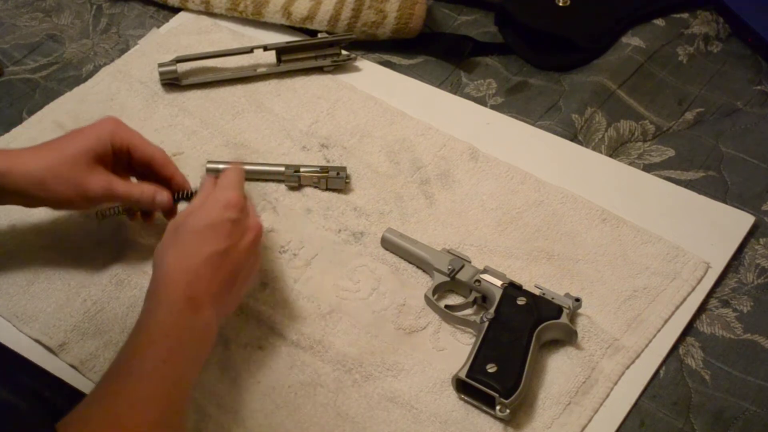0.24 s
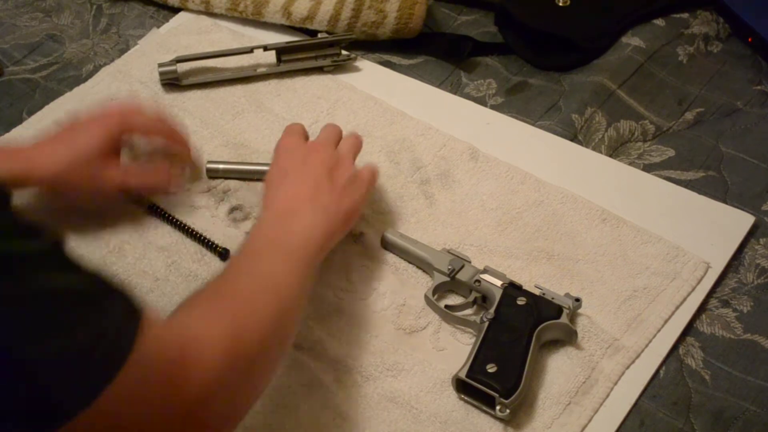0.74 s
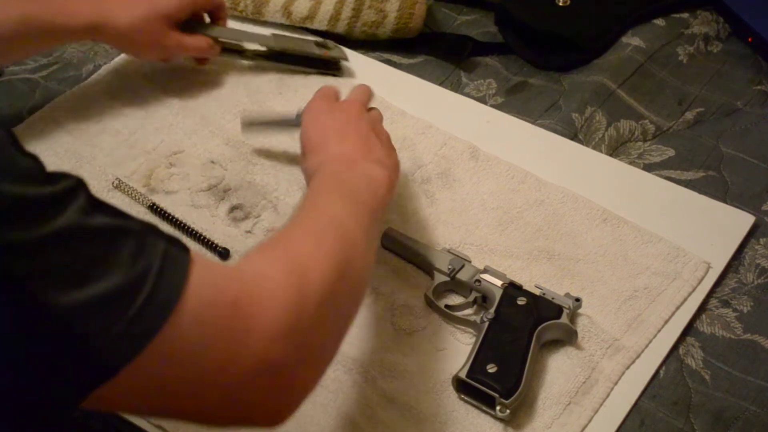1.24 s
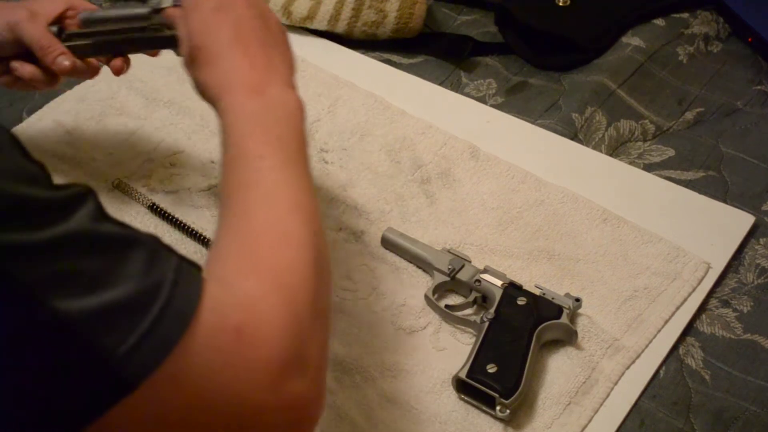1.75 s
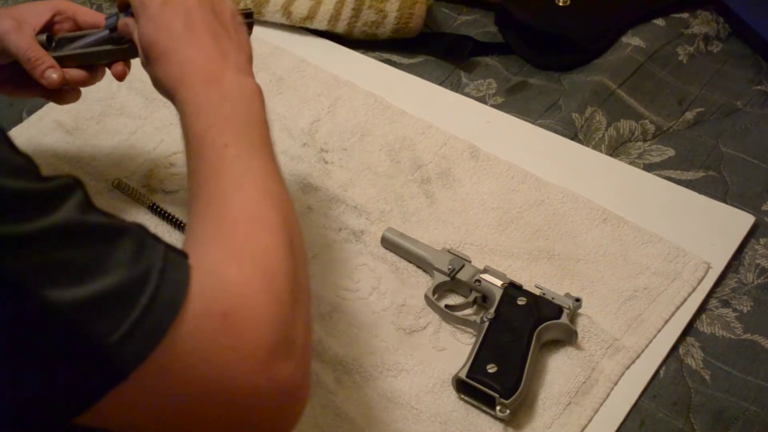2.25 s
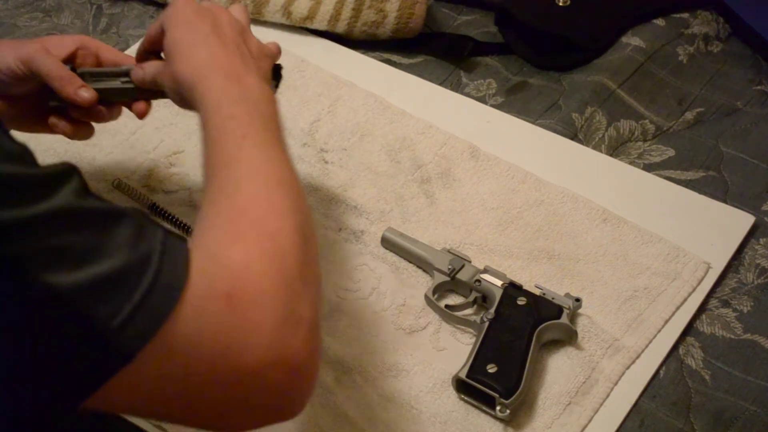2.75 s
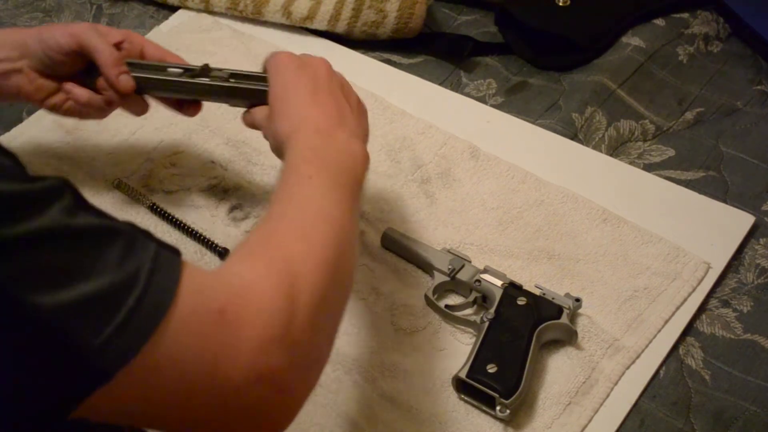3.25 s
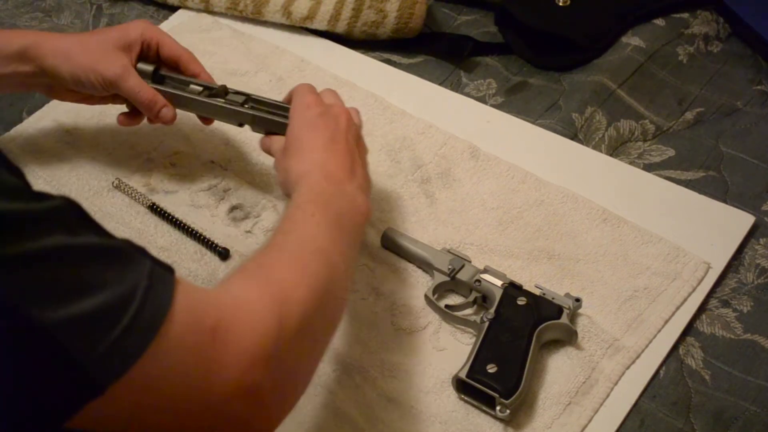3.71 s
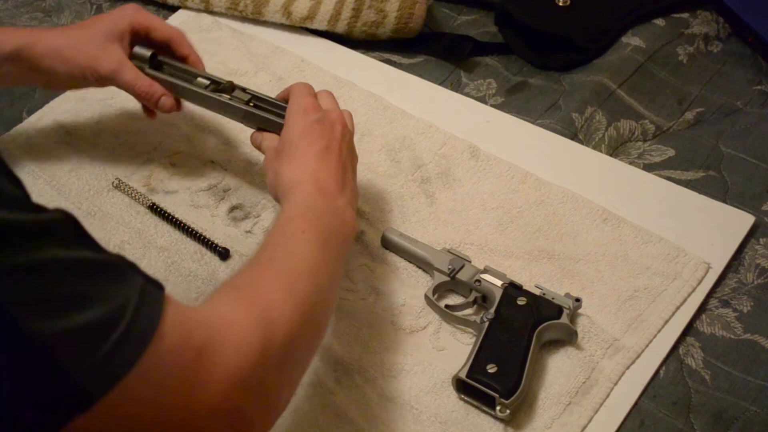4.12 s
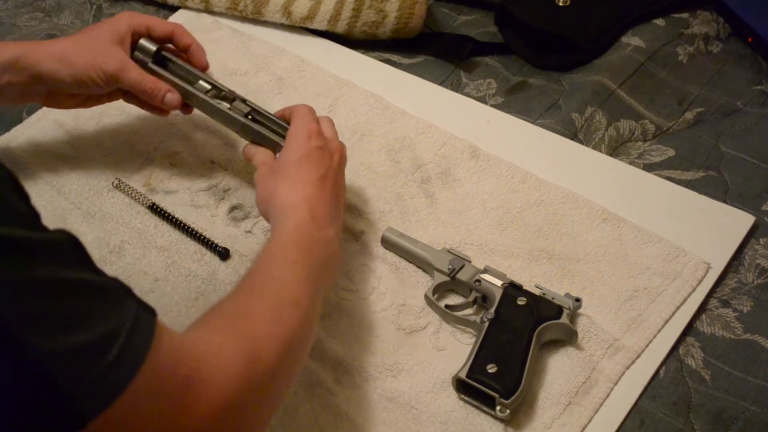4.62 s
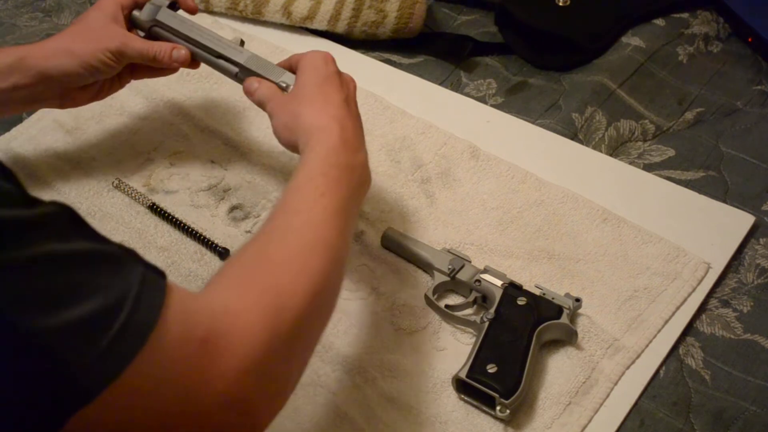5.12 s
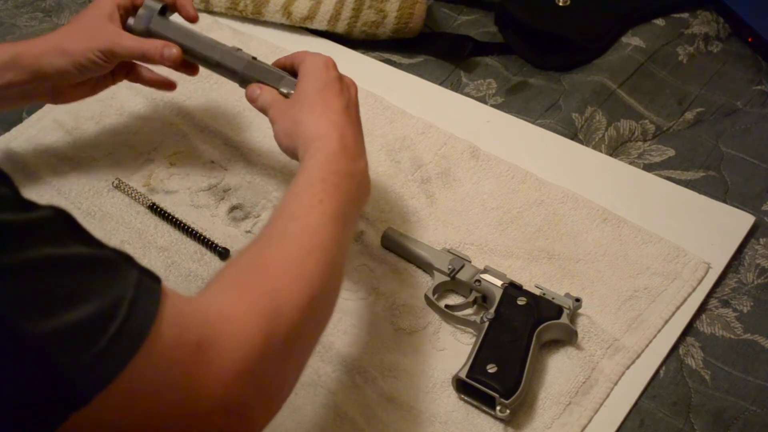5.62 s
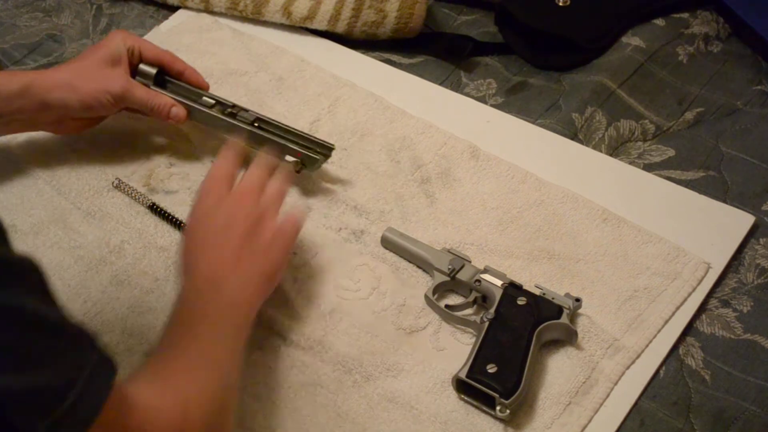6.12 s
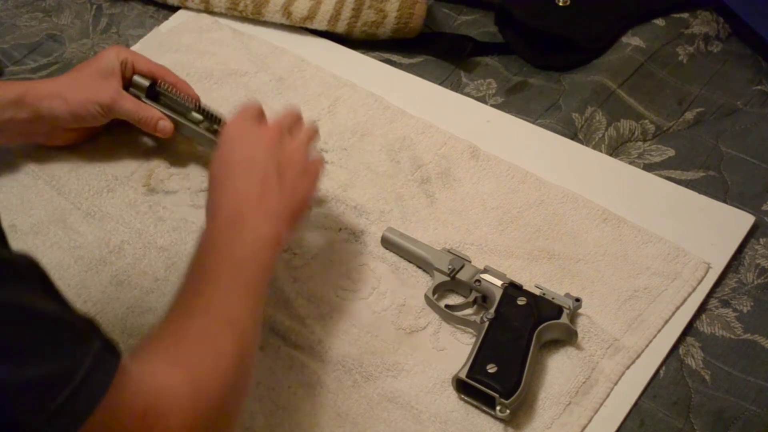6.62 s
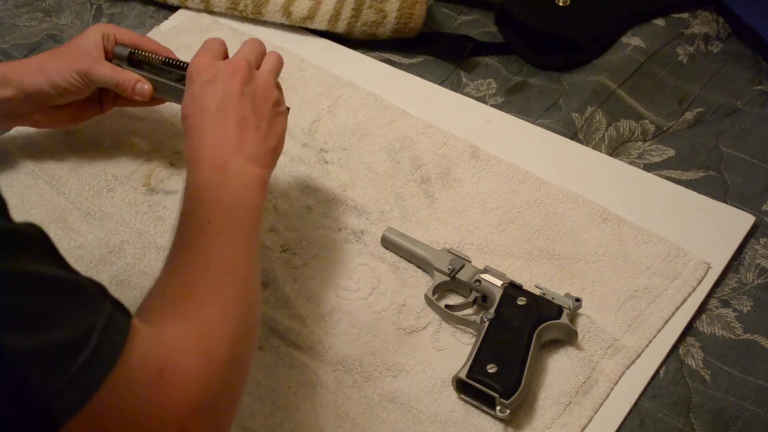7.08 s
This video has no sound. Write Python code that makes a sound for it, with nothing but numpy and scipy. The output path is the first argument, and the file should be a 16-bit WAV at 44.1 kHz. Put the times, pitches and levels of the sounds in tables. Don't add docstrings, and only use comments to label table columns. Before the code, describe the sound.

Small hand-held metal contacts, recorded nearby and slightly dull at the very top. Light coil rustling and a soft cloth-muffled bump lead to clusters of short ringing steel knocks, bounces and scrapes. After a quieter gap with a couple of dry clicks, the parts snap home loudly. A pause, then spring coils rustle and flick. Short room reverberation, with soft fan hiss and a barely audible hum throughout.

```python
import sys
import numpy as np
from scipy import signal
from scipy.fft import rfft, irfft
from scipy.io import wavfile

SR = 44100
rng = np.random.default_rng(int(sys.argv[2]) if len(sys.argv) > 2 else 0)


def store_wav(level_fs):
    pcm = np.round(np.clip(np.atleast_2d(level_fs), -1, 1) * 32767)
    wavfile.write(sys.argv[1], SR, pcm.T.astype(np.int16))


def volts_from_decibels(level):
    exponent = np.asarray(level, float) / 20
    return 10 ** exponent


N = 324135


def rms_one(x):
    return x / np.sqrt(np.mean(x ** 2) + 1e-20)


def at_hz(points, hz):
    table = np.array(points)
    return np.interp(np.log(hz + 1), np.log(table[:, 0]), table[:, 1])


def coloured(x, spectrum):
    log_gain = np.log(volts_from_decibels(at_hz(spectrum, np.fft.rfftfreq(2048, 1 / SR))))
    cepstrum = irfft(log_gain)
    cepstrum[1:1024] *= 2
    cepstrum[1025:] = 0
    impulse_response = irfft(np.exp(rfft(cepstrum)))
    return signal.oaconvolve(x, impulse_response)[:len(x)]


def ring(force, hz, t60):
    radius = volts_from_decibels(-60 / (t60 * SR))
    angle = 2 * np.pi * hz / SR
    return signal.lfilter([0, np.sin(angle)], [1, -2 * radius * np.cos(angle), radius ** 2], force + 1e-18)


def stroke_gain(strokes, rise_db_per_s, fall_db_per_s):
    t = np.arange(N) / SR
    gain = np.zeros(N)
    for start_s, length_s, level_db in strokes:
        before = np.clip(start_s - t, 0, 1)
        after = np.clip(t - start_s - length_s, 0, 1)
        gain += volts_from_decibels(level_db - rise_db_per_s * before - fall_db_per_s * after)
    return gain


def grains(per_s, spread_db, size=N):
    sizes = volts_from_decibels(spread_db * np.minimum(rng.exponential(1, size), 4)) * rng.choice([-1, 1], size)
    return rms_one(sizes * (rng.random(size) < per_s / SR))


def damped_t60(t60):
    return 0.42 * np.clip(t60, .03, .4)


# pitch_hz, level_db
STEEL_COLOUR = [(700, -34), (1400, -32), (1800, -5), (3600, -5), (4550, 8), (6500, -5), (10000, -2),
                (14000, -18)]


def blow(modes, crack_db, low_db, high_db):
    t = np.arange(SR // 6) / SR
    hz, mode_db, t60 = np.transpose(modes)
    colour = [(2000, low_db + 22), (4500, 0.0031), (8500, high_db + 17)]
    noise, luck = rng.standard_normal(len(t)), rng.standard_normal((3, len(hz)))
    chatter = .22 * noise * np.exp(-t / .004)
    chatter[0] = 1
    gains = volts_from_decibels(mode_db + at_hz(colour, hz) + luck[0]) / np.sqrt(np.sum(volts_from_decibels(mode_db) ** 2))
    pitches = hz * (1 + .004 * luck[1])
    lengths = damped_t60(t60) * volts_from_decibels(luck[2])
    rings = np.array([ring(chatter, f, d) + .45 * ring(chatter, f * 1.013, d / 2)
                      for f, d in zip(pitches, lengths)])
    ringing = 0.5 * (gains / np.abs(rings).max(axis=1)) @ rings
    sharp_edge = (1 - np.exp(-t / .0004)) * np.exp(-t / .0015)
    unresolved_modes = .09 * np.exp(-t / .011)
    crack = coloured(coloured(noise * (sharp_edge + unresolved_modes), STEEL_COLOUR), colour)
    return ringing + volts_from_decibels(crack_db) * crack


def friction(modes, strokes, span):
    hz, mode_db, t60 = np.transpose(modes)
    size = span.stop - span.start
    rough = grains(2500, 3.0, size=2 * SR)
    starts = rng.integers(0, SR, len(hz))
    hum = np.zeros(size)
    for i, db, f, d in zip(starts, mode_db, hz, damped_t60(t60)):
        hum += volts_from_decibels(0.76 * db) * ring(rough[i:i + size], f, .5 * d)
    scratch = .5 * rms_one(coloured(rough[:size], STEEL_COLOUR))
    gain = stroke_gain(strokes, rise_db_per_s=600.5, fall_db_per_s=260.5)[span]
    return (rms_one(hum) + scratch) * gain * volts_from_decibels(1.0)


def steel(hits, modes, rub=None):
    out = np.zeros(N)
    for start_s, peak_db, crack_db, low_db, high_db in hits:
        sound = volts_from_decibels(peak_db) * blow(modes, crack_db, low_db, high_db)
        at = round(start_s * SR)
        out[at:at + len(sound)] += sound
    if rub:
        span = slice(round((rub[0][0] - .1) * SR), round((rub[-1][0] + .3) * SR))
        out[span] += friction(modes, rub, span)
    lowest_hz = np.min(np.transpose(modes)[0])
    high_pass = signal.butter(6, min(.88 * lowest_hz, 1600), "high", fs=SR, output="sos")
    return signal.sosfilt(high_pass, out)


# start_s, peak_db, crack_over_ring_db, lows_db, highs_db
LIFT_HITS = [
    (1.4041, -38, -3, -36, -8),
]
# pitch_hz, level_db, t60_s
LIFT_BODY = [(4240, 2, .2), (6150, -4, .03), (7400, -8, .05), (8200, -7, .05), (9100, -9, .05),
             (10300, -12, .04)]


def lift():
    return steel(LIFT_HITS, LIFT_BODY)


# start_s, peak_db, crack_over_ring_db, lows_db, highs_db
ENTER_HITS = [
    (1.8148, -22, 3, -27, -15),
    (1.825, -26.5, -25, -24, -19),
]
# pitch_hz, level_db, t60_s
ENTER_BODY = [(1290, -8, 0.29), (2005, -5.5, 0.64), (2640, -8, 0.16), (2820, -7, 0.12), (3700, -26, 0.42),
              (4064, 5.5, 0.23), (4220, 6, 0.25), (4580, -17, 0.37), (4540, -5, 0.39), (4900, -20, 0.21),
              (5500, 2, 0.086), (5800, 2, 0.14), (5970, 1, 0.09), (6160, -16, 0.3), (6760, -30, 0.17),
              (7270, -26, 0.25), (8460, -30, 0.14), (9000, -12.5, 0.13), (8958, -18, 0.2),
              (9650, -11, 0.31)]


def enter():
    return steel(ENTER_HITS, ENTER_BODY)


# start_s, peak_db, crack_over_ring_db, lows_db, highs_db
SLIP_HITS = [
    (1.9965, -31.5, -2, -22.5, -25),
    (2.038, -32, -6, -32, -21),
    (2.059, -51.5, -6.5, -10.5, -1),
    (2.1168, -46, -9, -12, -14),
    (2.1512, -39, -26, -18, -33),
    (2.2237, -39, -26, -32, -31),
    (2.257, -49.5, -15, -11.5, -30),
]
# pitch_hz, level_db, t60_s
SLIP_BODY = [(1284, 0, .6), (1950, 3, .28), (2066, -14, .23), (2545, -9, .13), (3690, -16, .2),
             (4200, 2, .28), (4550, 1, .14), (5240, -13, .15), (5700, -16, .15), (6340, -19, .15),
             (7440, -21, .15), (8970, -15, .1), (9900, -21, .12)]


def slip():
    return steel(SLIP_HITS, SLIP_BODY)


# start_s, peak_db, crack_over_ring_db, lows_db, highs_db
FEED_HITS = [
    (2.3152, -23.5, 6, -23.5, -16),
    (2.3235, -24.5, -23, -21, -19),
    (2.332, -28.5, -20, -12, -21),
    (2.3474, -29, -20, -16, -32),
    (2.359, -35, -22, -20, -22),
    (2.408, -38, -20, -19, -29),
    (2.421, -58, -6, -22, -16),
    (2.4625, -28.5, -24, -56, -8.5),
    (2.475, -40, -16, -6.5, -25),
    (2.493, -43.5, -12, -8, -18),
]
# pitch_hz, level_db, t60_s
FEED_BODY = [(1284, -10, .35), (1660, -18, .25), (1950, -9, .2), (2070, -16, .2), (2520, -5, .17),
             (2680, -6, .12), (3590, -23, .2), (4060, -12, .15), (4240, 3, .22), (4560, 2, .2),
             (4760, -7, .12), (5240, -11, .12), (5490, -1, .1), (5790, -3, .1), (6310, -10, .14),
             (7400, -13, .1), (8400, -18, .1), (9100, -22, .1), (9900, -18, .1)]
# start_s, length_s, level_db
FEED_STROKES = [
    (1.997, 0.037, -68),
    (2.12, 0.013, -54),
    (2.152, 0.0093, -68),
    (2.225, 0.093, -59),
    (2.37, 0.061, -57.5),
    (2.52, 0.086, -71),
]


def feed():
    return steel(FEED_HITS, FEED_BODY, FEED_STROKES)


# start_s, peak_db, crack_over_ring_db, lows_db, highs_db
NUDGE_HITS = [
    (2.7788, -24.5, -0.5, -44, -12),
    (2.8257, -22.5, -15, -25, -21),
    (2.8325, -29, -20, -17.5, -27),
]
# pitch_hz, level_db, t60_s
NUDGE_BODY = [(2020, -7, .2), (2490, -8.5, .15), (4100, -17.5, .15), (4295, -12.5, .15), (4600, 7, 0.073),
              (4840, -7, 0.081), (5200, -15.5, 0.092), (5730, -11.5, .12), (6000, -14.5, .1),
              (7440, -21.5, .08), (8240, -9.5, 0.19), (9020, -16, .08), (9920, -16.5, .15)]


def nudge():
    return steel(NUDGE_HITS, NUDGE_BODY)


# start_s, peak_db, crack_over_ring_db, lows_db, highs_db
DROP_HITS = [
    (2.8427, -24, -13.5, -39, -7.5),
    (2.8452, -17, 1.5, -38, -6.5),
    (2.853, -26.5, -18.5, -19, -11),
    (2.868, -24.5, -18, -22.5, -18),
    (3.027, -45, -4, -11, -31),
]
# pitch_hz, level_db, t60_s
DROP_BODY = [(2050, -7, .25), (2540, -18, .2), (4000, -14, .15), (4315, 2, .24), (4480, 5, .16),
             (4750, -12, .15), (5100, -10, .14), (5480, -13, .15), (5780, -9, .15), (6300, -24, .15),
             (6650, -24, .15), (6850, -20, .15), (7500, -24, .12), (8300, -12, .1), (8640, -19, .1),
             (8990, -6, .12), (9600, -11, .12), (10230, 0, .13), (10450, -9, .13), (13500, -14, .15)]


def drop():
    return steel(DROP_HITS, DROP_BODY)


# start_s, peak_db, crack_over_ring_db, lows_db, highs_db
PUSH_HITS = [(3.185, -45, -4, -21, -24), (3.2405, -41, -10, -25, -8), (3.2433, -24.5, -11, -33, -10.5),
             (3.2505, -36, -12, -31, -18), (3.2545, -33, -20, -9.5, -20), (3.2655, -42, -20, -8, -18),
             (3.2917, -18, 5.5, -45, -17.5), (3.2981, -32, -1.5, -29, 1), (3.364, -38, -20, -23, -25),
             (3.3765, -34, -20, -22, -25), (3.401, -30, -20, -24, -27), (3.428, -37, -16, -19, -23),
             (3.448, -40, -8, -6, -22), (3.482, -43, -2, -8, -13)]
# pitch_hz, level_db, t60_s
PUSH_BODY = [(1650, -21, .2), (1970, -14, 0.34), (2055, -19, 0.22), (2550, -8, .15), (3960, -12, 0.33),
             (4260, 2, 0.12), (4590, 8.5, 0.085), (4700, -11, 0.18), (5190, -8, 0.17), (5530, -7, 0.2),
             (5640, -10, 0.22), (6400, -5, 0.18), (7400, -10, 0.079), (8300, -23, 0.11), (9000, -18, 0.089),
             (9950, -12, 0.082), (10200, -30, .12)]
# start_s, length_s, level_db
PUSH_STROKES = [
    (3.30, 0.026, -52),
    (3.376, 0.057, -50.5),
]


def push():
    return steel(PUSH_HITS, PUSH_BODY, PUSH_STROKES)


# start_s, peak_db, crack_over_ring_db, lows_db, highs_db
ROCK_HITS = [(3.6613, -40, -17, -14, -22), (3.6768, -38, -12, -16, -22), (3.6992, -15, -23, -25, -52),
             (3.7165, -18, -2.5, -44, -17), (3.7225, -33, -18, -34, -22), (3.734, -33, -18, -27, -22),
             (3.743, -36, -18, -30, -19), (3.7545, -40, -16, -22, -18), (3.7615, -32, -20, -21, -20),
             (3.7681, -17.5, 4, -23, -16.5), (3.7745, -31, -21, -18, -24), (3.785, -37, -18, -22, 1),
             (3.793, -38, -18, -13, -15), (3.804, -41, -18, -18, -16), (3.8913, -45, 7, -27, -27)]
# pitch_hz, level_db, t60_s
ROCK_BODY = [(1275, -20, .3), (1745, -17, .2), (1958, -7, .2), (2505, -14, .15), (2980, -24, .1),
             (3900, -19, .12), (4135, -12, .15), (4300, -7, .15), (4520, 8, .11), (4755, -2, .12),
             (4950, -12, .12), (5240, -7, .14), (5460, -11, .15), (5755, -13, .12), (6300, -14, .18),
             (6410, -12, .18), (7500, -19, .15), (8800, -17, .08), (9800, -18, .1), (12600, -15, .1)]
# start_s, length_s, level_db
ROCK_STROKES = [
    (3.618, 0.011, -68),
    (3.688, .015, -55),
    (3.725, 0.04, -44),
]


def rock():
    return steel(ROCK_HITS, ROCK_BODY, ROCK_STROKES)


# start_s, peak_db, crack_over_ring_db, lows_db, highs_db
TURN_HITS = [
    (4.373, -30, 0, -24.5, -13.5),
]
# pitch_hz, level_db, t60_s
TURN_BODY = [(2040, -16, .1), (4260, -3, .08), (4660, -6, .08), (5320, 2, .045), (6100, -12, .06),
             (7360, -10, .08), (8990, -7, .05), (9900, -16, .07)]


def turn():
    return steel(TURN_HITS, TURN_BODY)


# start_s, peak_db, crack_over_ring_db, lows_db, highs_db
TILT_HITS = [
    (4.5436, -31.5, -2, -26.5, -20),
    (4.5471, -48, -12, -13, -34),
]
# pitch_hz, level_db, t60_s
TILT_BODY = [(1710, -2, .1), (2610, -3, .1), (3920, -1, .07), (4530, -6, .07), (5300, 0, .05),
             (6500, -9, .07), (7420, -15, .08), (8800, -12, .07)]


def tilt():
    return steel(TILT_HITS, TILT_BODY)


# start_s, peak_db, crack_over_ring_db, lows_db, highs_db
LOCK_HITS = [
    (5.2535, -40, -25, -35, -35),
    (5.2612, -32.5, -8, -33, -2),
    (5.2643, -25, -18, -31, -14),
    (5.2688, -27, -17, -21, -31),
    (5.2822, -13.5, -1, -26.5, -8),
    (5.2865, -16, -24, -22, -12),
    (5.2975, -28, -18, -34, -19),
    (5.309, -32.5, -18, -27, -19),
    (5.4818, -48, -17, -13, -14),
    (5.494, -42.5, -9, -16.5, -36),
]
# pitch_hz, level_db, t60_s
LOCK_BODY = [(1750, -6, .23), (2030, -2, .18), (2560, -17, .2), (3000, -20, .12), (4090, -9, .12),
             (4310, -5, .15), (4565, 6, .1), (4745, -1, .15), (5200, 0, .2), (5490, -11, .12),
             (5720, -15, .15), (6360, -11, .17), (6770, -14, .15), (7110, -9, .14), (7400, -19, .12),
             (8140, -24, .1), (8600, -14, .1), (8950, -8, .17), (9135, -8, .17), (10300, -13, .13)]


def lock():
    return steel(LOCK_HITS, LOCK_BODY)


# start_s, length_s, level_db
RUSTLE_STROKES = [
    (0.001, .005, -68.5),
    (.09, 0.075, -67.5),
    (.875, .01, -78),
    (1.03, 0.11, -77.5),
    (1.182, .01, -69),
    (1.32, 0.027, -87),
    (6.826, 0.047, -70),
    (6.965, 0.061, -64),
    (7.252, .01, -61),
    (7.265, 0.0053, -48.5),
]
# pitch_hz, level_db_per_hz
COIL_COLOUR = [(2060, -17), (3500, -9), (4140, -10), (5040, -9), (5560, -5), (6870, -1.5), (7930, -3.5),
               (9330, 3.5), (11400, -2), (13300, -11), (14800, -47), (22000, -120)]
# start_s, peak_db, ring_hz, ring_over_click_db
TICKS = [(.156, -50, 6400, -9), (.168, -51, 6900, -8), (0.4652, -61, 6800, 7), (0.5012, -37, 7000, -13),
         (.885, -62, 4200, 9.5), (1.1715, -52, 9000, -6), (1.1768, -42, 8300, -17), (5.582, -66, 10000, 7),
         (6.822, -59.5, 9250, 6.5), (7.2645, -39.5, 6300, -1), (7.28, -43.5, 5100, 2.5),
         (7.285, -51, 2380, 2.5)]


def spring():
    rustle = rms_one(coloured(grains(5000, 1.0), COIL_COLOUR))
    out = rustle * stroke_gain(RUSTLE_STROKES, rise_db_per_s=4000, fall_db_per_s=450) * volts_from_decibels(5.0)
    for start_s, peak_db, hz, ring_db in TICKS:
        click = np.zeros(900)
        click[0] = volts_from_decibels(peak_db)
        ringing = 1.17 * volts_from_decibels(ring_db) * ring(click, hz, 60.0 / hz)
        at = round(start_s * SR)
        out[at:at + 900] += ringing + 8.8 * coloured(click, COIL_COLOUR)
    return out


# start_s, peak_db, hardness_hz
PUSHES = [
    (0.498, -42, 420),
    (.503, -59, 503),
    (1.119, -43.5, 900),
    (1.1718, -20, 1510),
    (1.176, -26.5, 1600),
    (1.179, -31, 2000),
    (2.8479, -43, 1215),
]
# pitch_hz, level_db, t60_s
BOARD_MODES = [(220, 2.5, 0.035), (349, 12.5, 0.023), (690, 12.5, 0.015), (790, 3.5, 0.072),
               (1380, -31, 0.026), (1430, 13, 0.0043), (2250, -26.5, 0.049), (2830, -12.5, 0.027)]


def thumps():
    force, t = np.zeros(3 * SR), np.arange(300) / SR
    for start_s, peak_db, hardness_hz in PUSHES:
        phase = 2 * np.pi * hardness_hz * t
        at = round(start_s * SR)
        force[at:at + 300] += volts_from_decibels(peak_db) * (phase * np.exp(1 - phase)) ** 2
    thump = 1.29 * force
    for k, (hz, level_db, t60) in enumerate(BOARD_MODES):
        thump += (-1) ** k * volts_from_decibels(level_db - 40) * ring(force, hz, t60)
    thump = signal.sosfilt(signal.butter(2, 140, "high", fs=SR, output="sos"), thump)
    towel = signal.butter(2, 4200, fs=SR, output="sos")
    return np.pad(signal.sosfilt(towel, thump), (0, N - len(force)))


# pitch_hz, t60_s
ROOM_DECAY = [(500, 0.15), (2000, 0.23), (5000, 0.23), (10000, 0.17)]


def room(x):
    t = np.arange(SR // 2) / SR
    tail, edges = np.zeros(len(t)), 125 * 2. ** np.arange(8)
    for low, high in zip(edges, edges[1:]):
        octave = signal.butter(2, [low, high], "band", fs=SR, output="sos")
        band = signal.sosfilt(octave, rng.standard_normal(len(t)))
        tail += band * volts_from_decibels(-60 * t / at_hz(ROOM_DECAY, np.sqrt(low * high)))
    rise_s = 0.002
    tail *= 1 - np.exp(-(t / rise_s) ** 2)
    return volts_from_decibels(-4.5) * signal.oaconvolve(x, tail / np.sqrt(np.sum(tail ** 2)))[:N]


# pitch_hz, level_db_per_hz
FLOOR_COLOUR = [(20, -19), (70, -13), (150, -6), (370, -1), (900, -1.5), (2000, -6), (2500, -8.5),
                (3300, -16), (5000, -15.5), (7000, -21.5), (9000, -24), (11000, -24.5), (14000, -34)]
# pitch_hz, width_hz, level_db
FAN_WHISTLES = [
    (2156, 35, -77),
    (2979, 91, -68.5),
    (3670, 140, -76.5),
    (4550, 83, -81.5),
]


def floor():
    spectrum = rfft(rng.standard_normal(N)) * volts_from_decibels(at_hz(FLOOR_COLOUR, np.fft.rfftfreq(N, 1 / SR)))
    out = volts_from_decibels(-63.5) * rms_one(irfft(spectrum, N))
    for hz, width_hz, level_db in FAN_WHISTLES:
        t60 = np.log(1000) / np.pi / width_hz
        out += volts_from_decibels(level_db) * rms_one(ring(rng.standard_normal(N), hz, t60))
    hum = np.sqrt(2) * np.sin(2 * np.pi * 52 * np.arange(N) / SR)
    return out + volts_from_decibels(-79.5) * hum


def scene():
    parts = lift() + enter() + slip() + feed() + nudge() + drop()
    parts += push() + rock() + turn() + tilt() + lock()
    parts += spring() + thumps()
    return (parts + room(parts) + floor())[None]


def top_cut(x):
    return signal.sosfilt(signal.butter(12, 13900, fs=SR, output="sos"), x)


# pitch_hz, level_db
MICROPHONE_COLOUR = [(7000, 0), (7950, -6.5), (8500, -1), (10800, -9.5), (11600, -25.5), (12100, -33.5),
                     (13000, -26), (13900, -48.5), (16000, -59)]


def record(dry):
    mix = coloured(dry[0], MICROPHONE_COLOUR)[None]
    return top_cut(mix)


dry = scene()
out = record(dry)
store_wav(out)
```